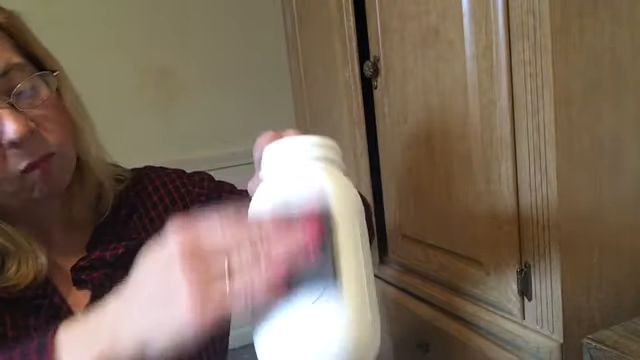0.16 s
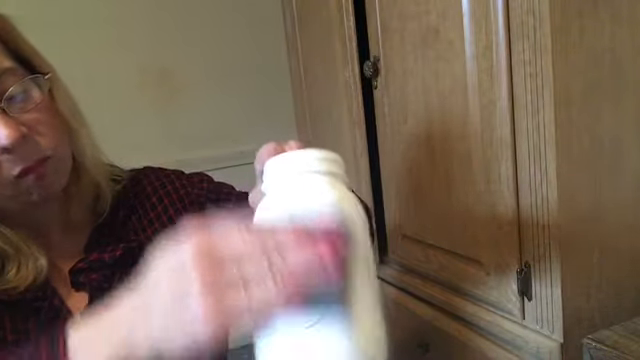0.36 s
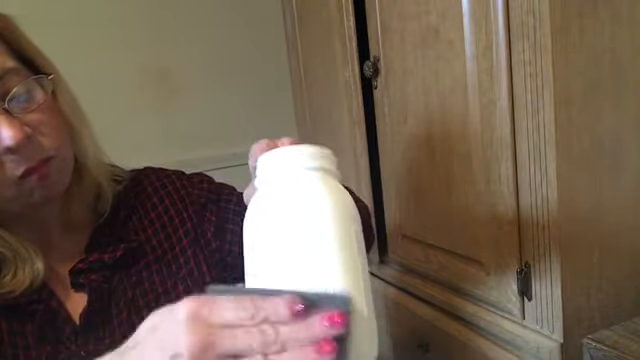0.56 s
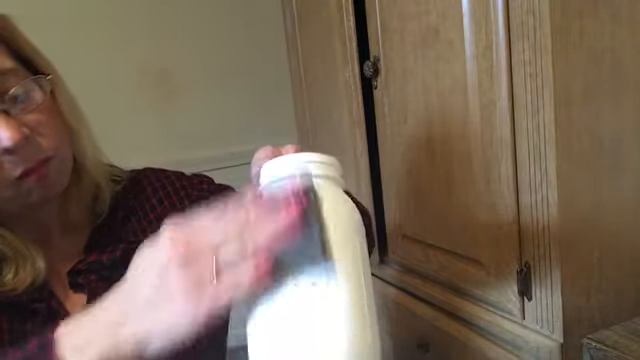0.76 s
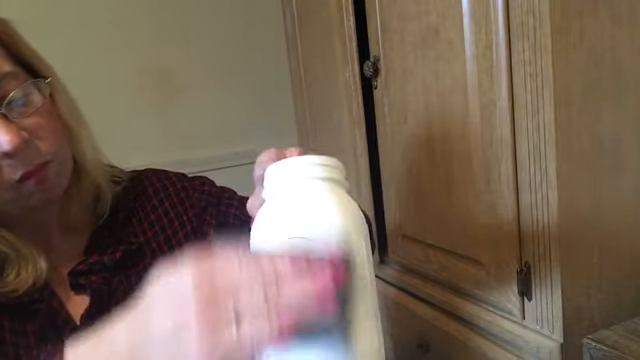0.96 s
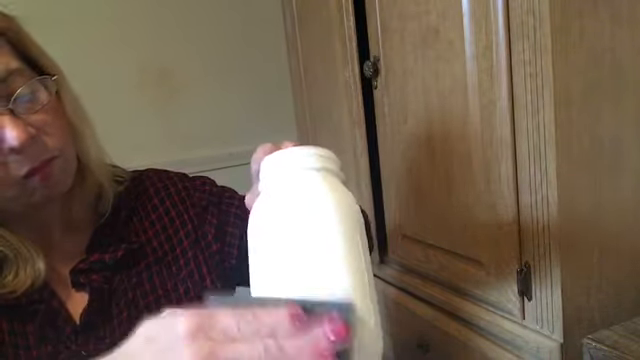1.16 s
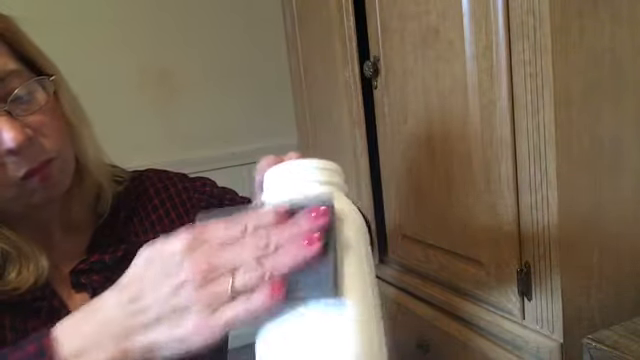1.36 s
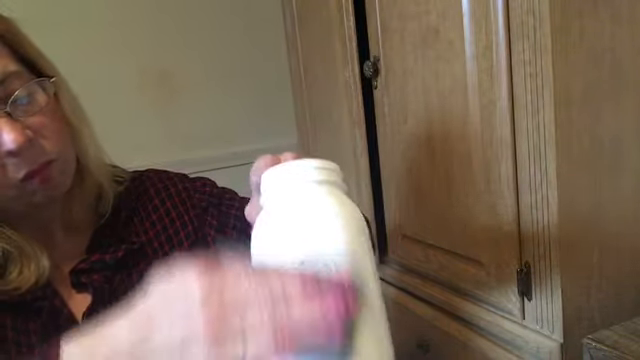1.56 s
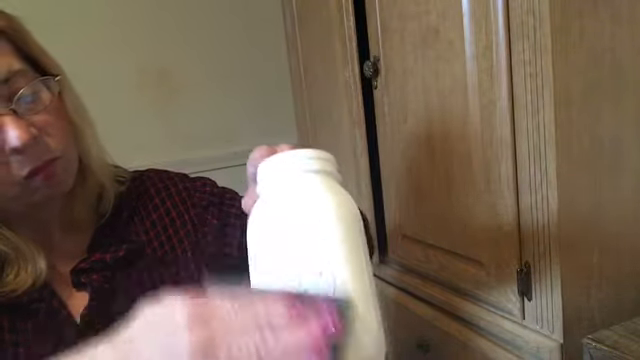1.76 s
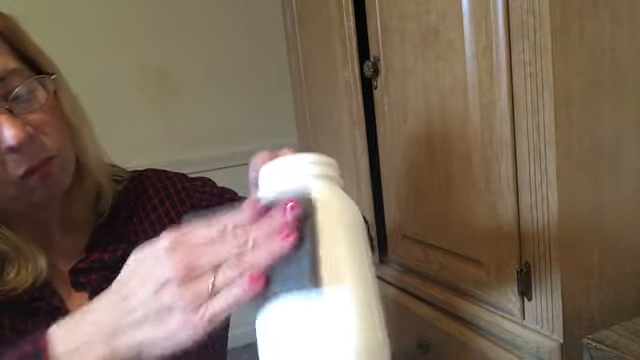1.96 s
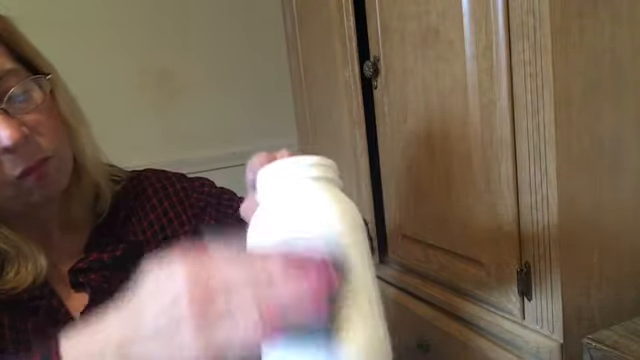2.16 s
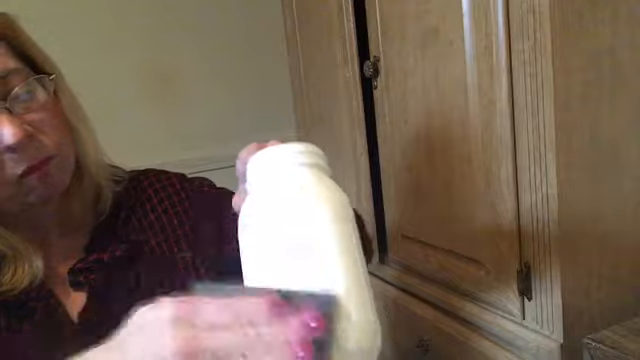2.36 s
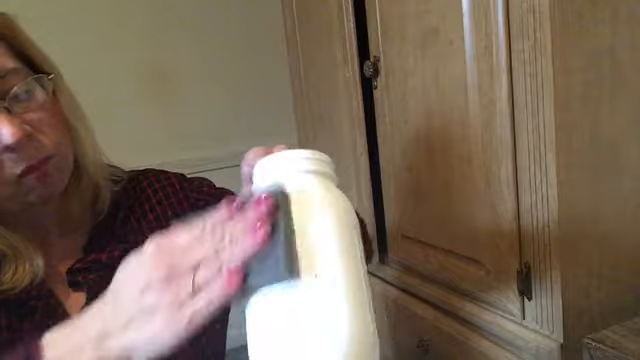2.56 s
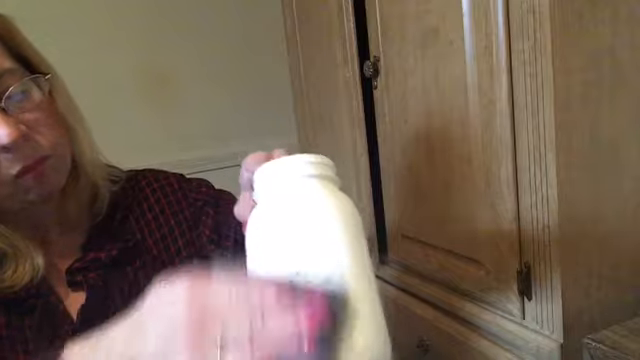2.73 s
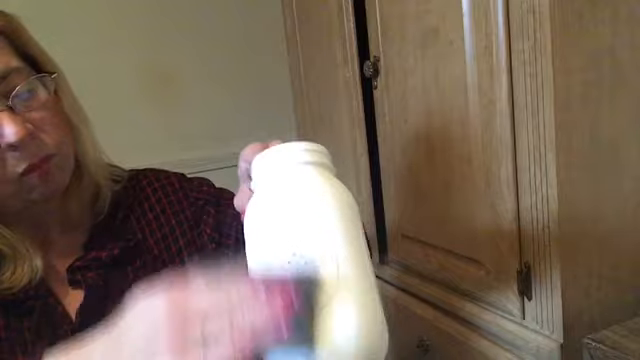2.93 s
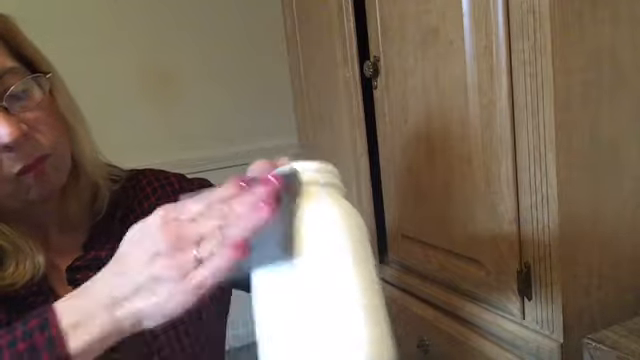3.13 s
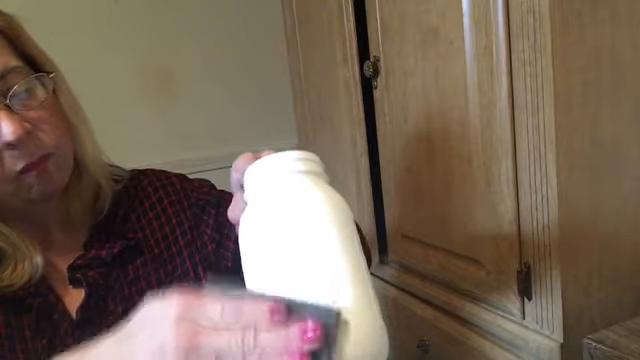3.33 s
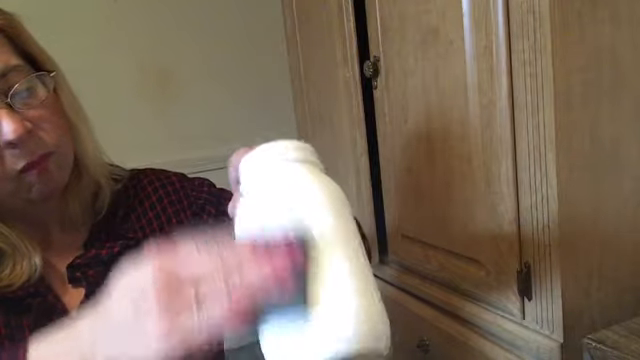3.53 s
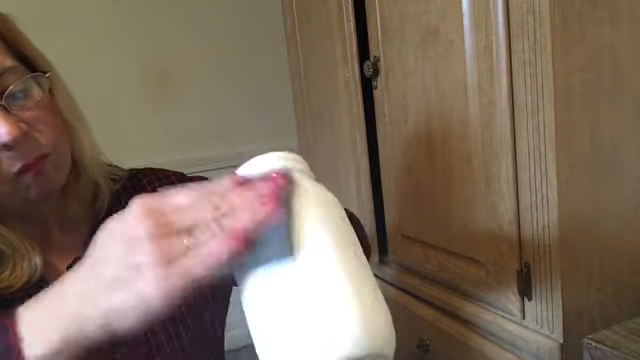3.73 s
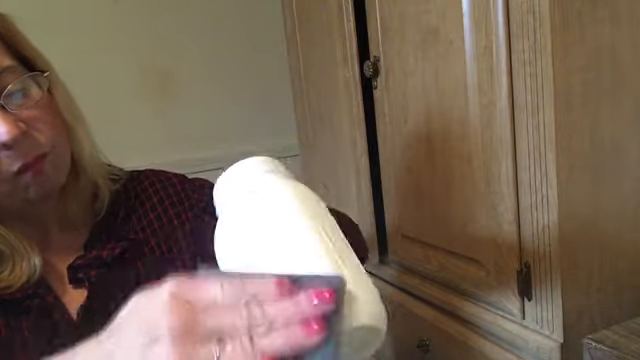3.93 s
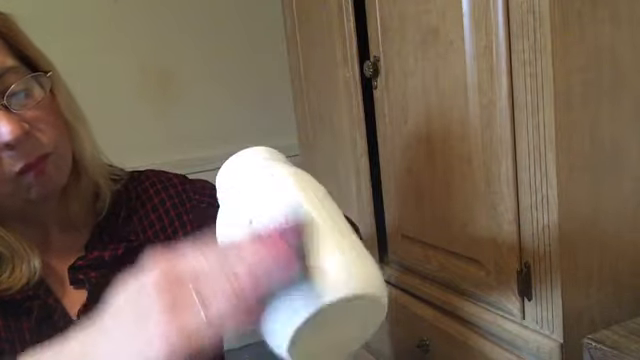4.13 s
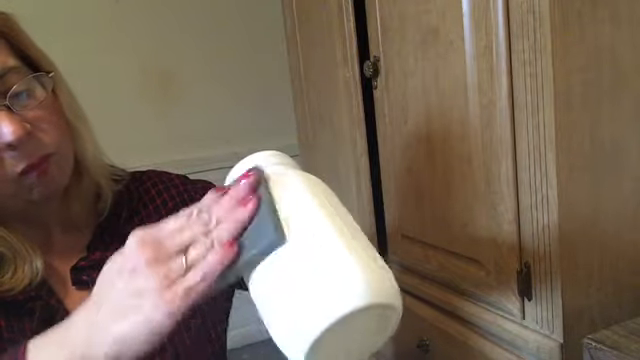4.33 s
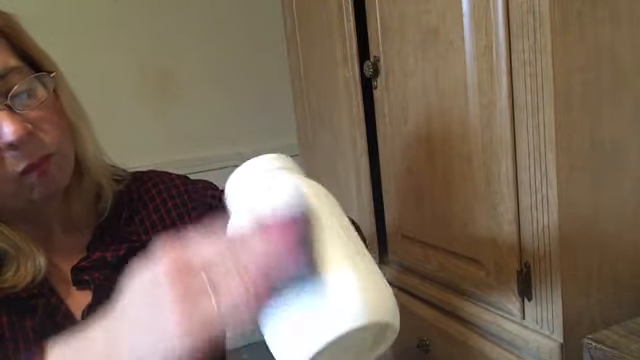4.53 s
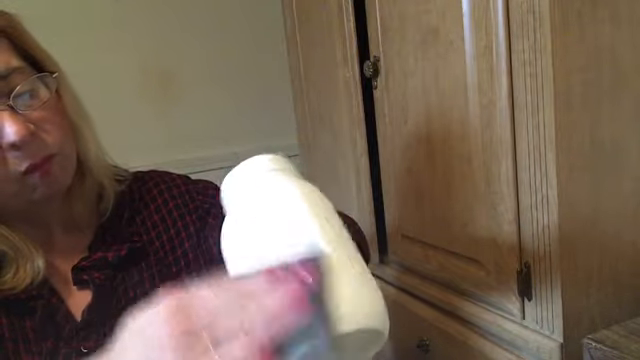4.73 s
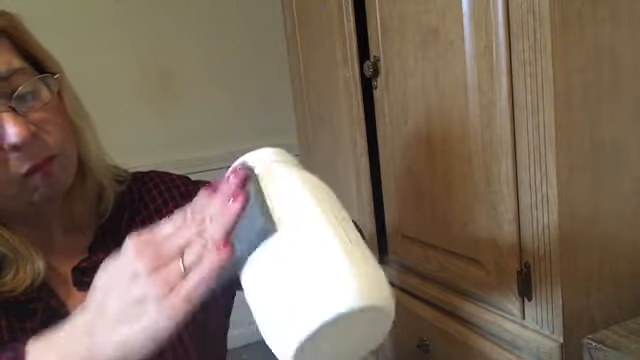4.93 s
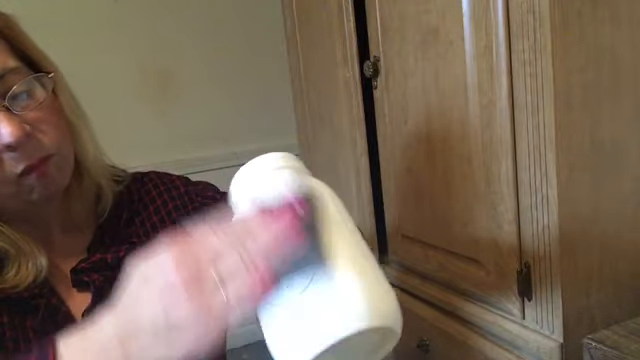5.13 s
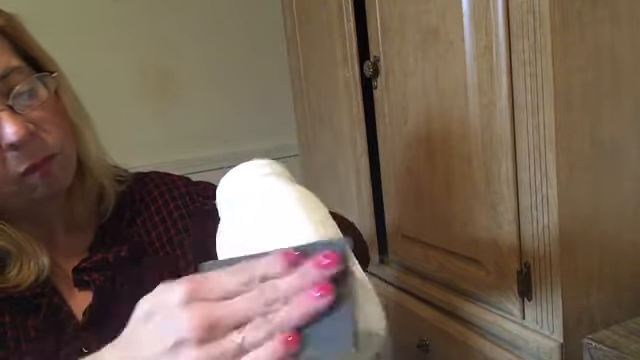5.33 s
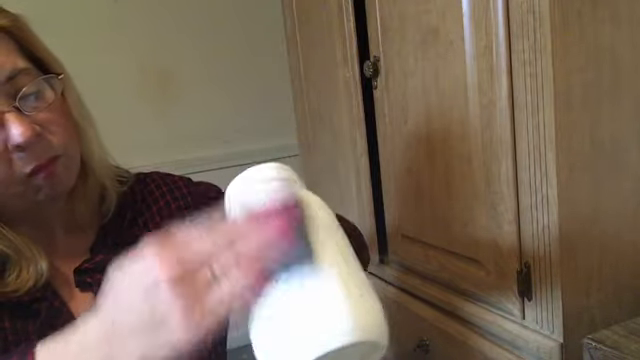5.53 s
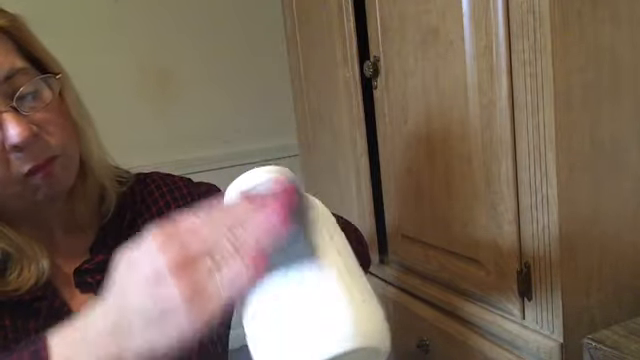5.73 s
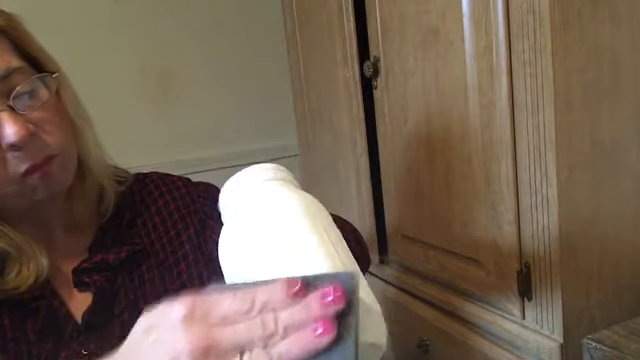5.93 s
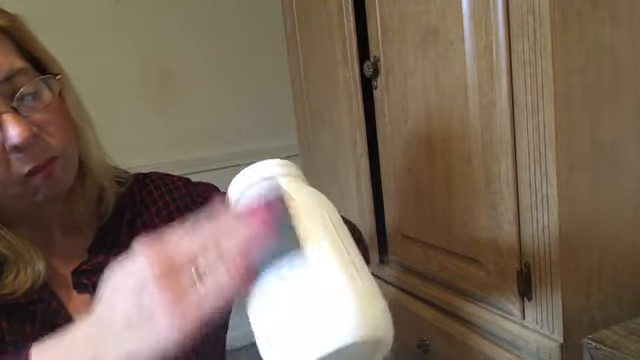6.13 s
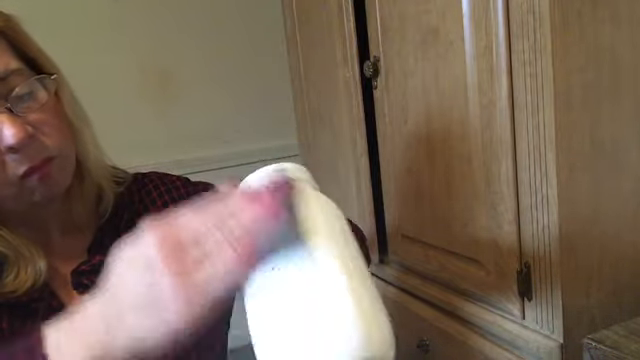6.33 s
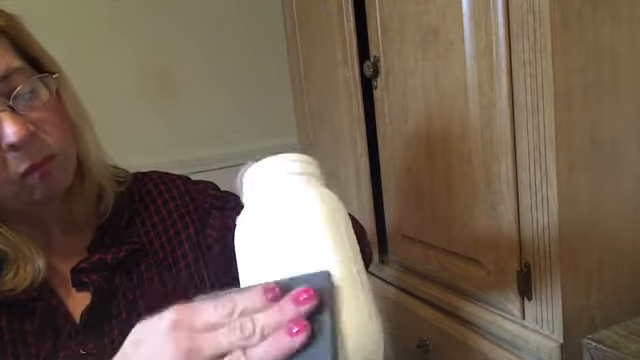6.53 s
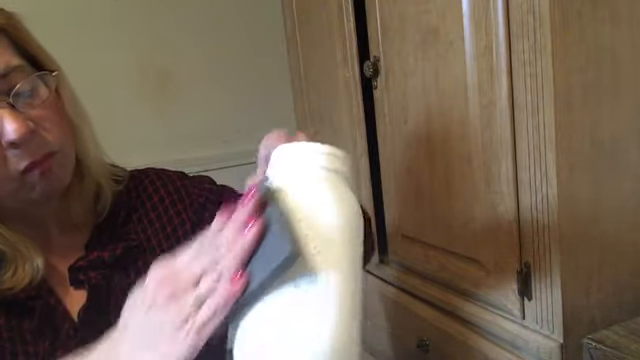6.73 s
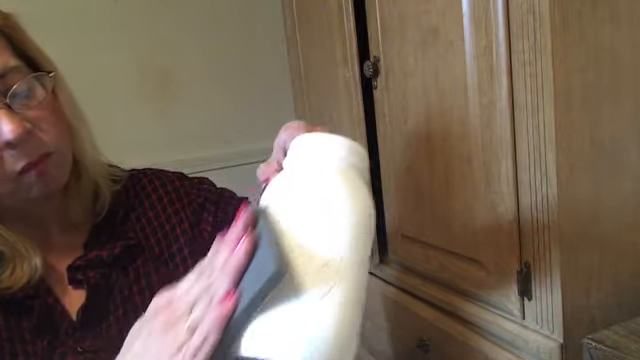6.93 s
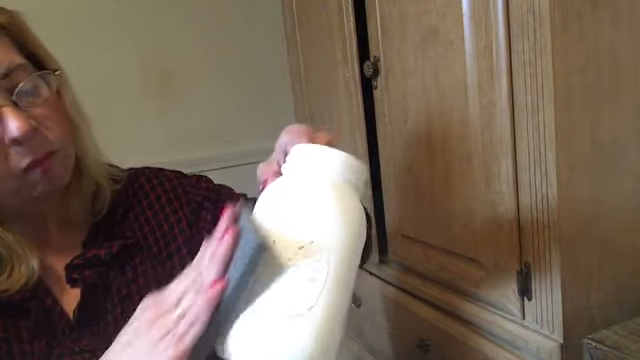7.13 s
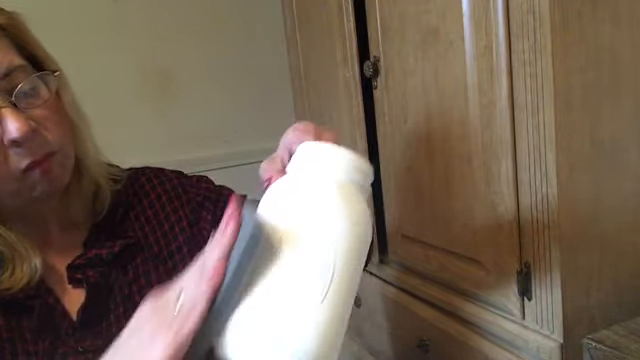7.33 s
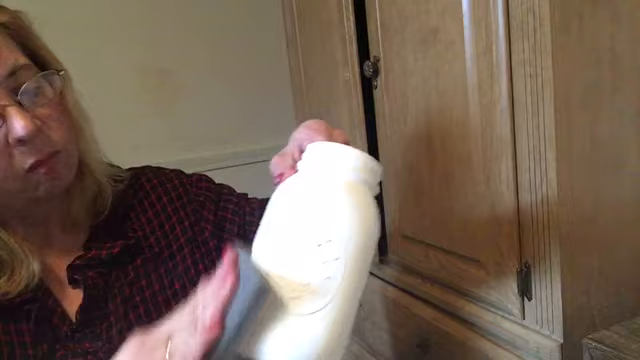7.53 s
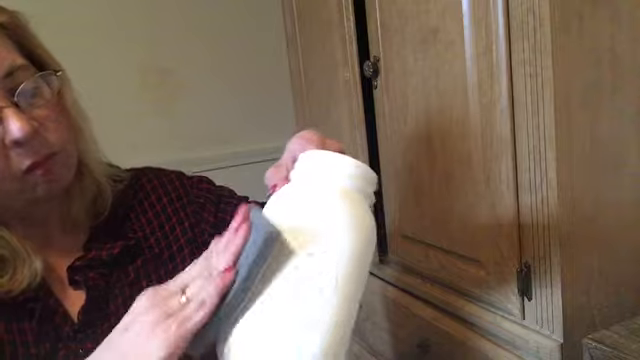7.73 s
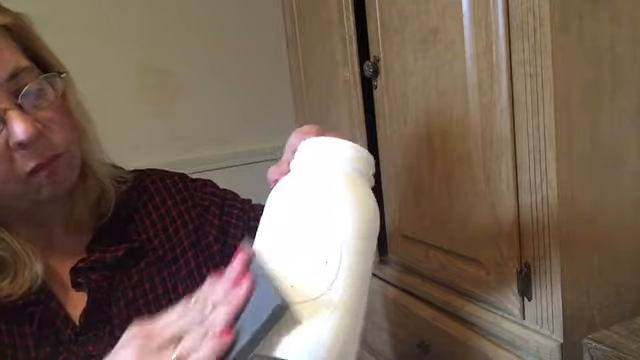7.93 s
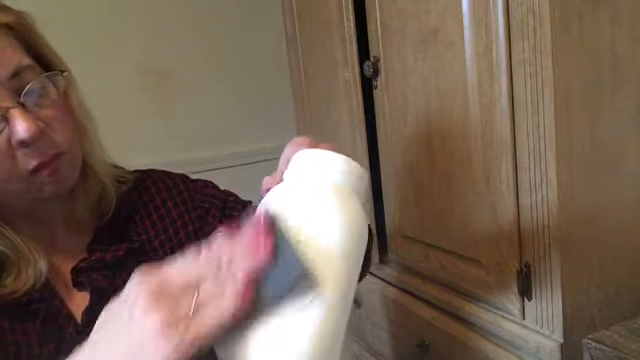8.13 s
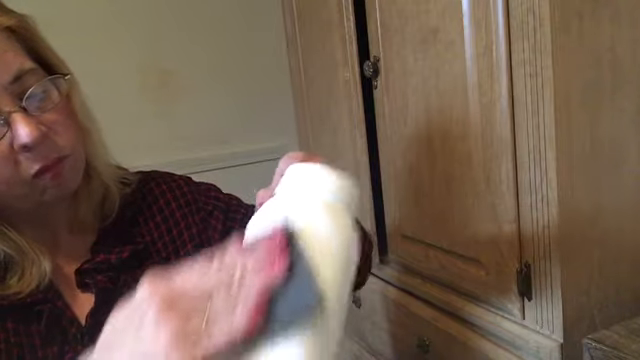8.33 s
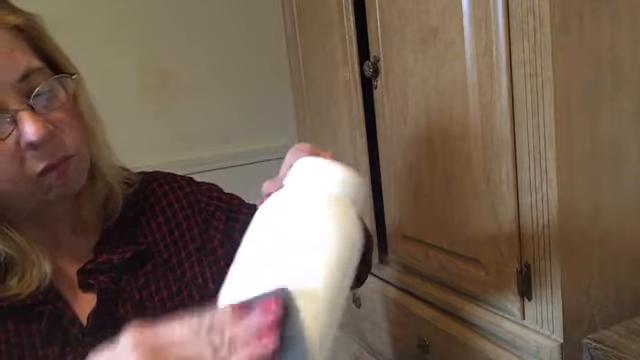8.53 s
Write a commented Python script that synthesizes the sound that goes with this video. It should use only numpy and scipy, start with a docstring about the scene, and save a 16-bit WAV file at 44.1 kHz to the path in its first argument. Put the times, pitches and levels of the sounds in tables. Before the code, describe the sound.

From 0 s a fine sanding sponge is already rubbing a painted glass jar, about seven strokes a second, close to the microphone in a quiet room. Each stroke is a dry, grainy rasp with bright hiss, swelling mid-stroke and dipping at the turn. Strokes are strongest around 0.3-1 s, then alternate between hissier and fuller scratches until about 3.3 s. From 3.5 to 4.1 s they are a little softer, with a faint glassy ring, then firmer and lower-toned through 6.3 s. At about 6.4 s a finger bumps the jar with a small, quickly decaying hollow knock. After strong strokes to 6.8 s, the rubbing turns notably lighter from 6.9 to 7.9 s, with slight thin singing from the glass, then strengthens until the cut-off at 8.6 s. Faint air, rumble and wavering low hum lie beneath.

```python
"""A fine sanding sponge rubs up and down a painted glass jar held in the hand, about seven strokes a second.
Grit is noise with snagging grains, swelling with the hand's speed; the glass wall and the air inside ring along.
A finger bumps the jar once: a decaying knock and an air tone. The quiet room adds a short noise tail,
steady air, a low rumble of shaped noise and a wavering sine hum. One close microphone feeds both channels."""
import sys
import numpy as np
from scipy import signal
from scipy.fft import rfft, irfft, next_fast_len
from scipy.io import wavfile
from scipy.ndimage import uniform_filter1d, map_coordinates

SR = 44100
rng = np.random.default_rng(int(sys.argv[2]) if len(sys.argv) > 2 else 0)


def gain_from_db(level_db):
    """Convert decibel levels to linear amplitude factors (20 dB per decade)."""
    decades = np.asarray(level_db, float) / 20
    return 10 ** decades


def wrap_up_sound(samples):
    """Save the sound to the file named by the first command line argument, as 16-bit audio."""
    columns = np.atleast_2d(samples).T
    # keep every value between -1 and 1, then stretch to whole-number steps
    tamed = np.clip(columns, -1, 1)
    steps = np.round(tamed * 32767).astype(np.int16)
    wavfile.write(sys.argv[1], SR, steps)


N = 378378  # length in samples

# centre level of the low house rumble: t/s, level/dB
RUMBLE_LEVEL = [(0, -71), (3, -75), (5, -73), (5.6, -70.5), (7.2, -67.5), (8.58, -72)]
# spectrum of the rumble: f/Hz, relative level per Hz/dB
RUMBLE_COLOUR = [(15, -40), (30, -5), (50, -9), (80, 3), (110, -10), (150, -38)]
# spectrum of the steady room air: f/Hz, relative level per Hz/dB
AIR_COLOUR = [(20, -27), (60, -10), (120, -2), (250, -6.5), (700, -4.5), (3000, -19.5), (15000, -45)]
# stronger spells of the low hum: start t/s, end t/s, centre f/Hz, centre level/dB
HUM_SPELLS = [(2.27, 3.52, 52.1, -68.5), (5.243, 5.44, 57, -60), (5.46, 6.4, 59.5, -68.5),
              (7.03, 7.3, 53.5, -63)]
# decay of the room's answer: f/Hz, time to fall 60 dB t/s
ROOM_DECAY = [(300, 0.31), (2500, 0.05), (12000, 0.07)]
# a finger bumps the jar: t/s, level/dB
FINGER_BUMPS = [(6.414, -34.5)]
# broad colour of grit on painted glass: f/Hz, relative level per Hz/dB
GRIT_COLOUR = [(120, -54.5), (215, -27.5), (260, -22.5), (450, -14.5), (640, -18), (740, -25.5),
               (1000, -17.5), (1130, -11.5), (1280, -4.5), (1580, -4), (1870, -6.5), (2460, -3), (3640, -4),
               (4850, -9), (5600, -3.5), (6100, -5.5), (6700, -4.5), (9600, -5.5), (10400, -9),
               (11500, -5.5), (15000, -11.5), (16000, -14)]
# air and wall modes of the jar, damped by hand and paint: f/Hz, width f/Hz, level over the grit/dB
JAR_MODES = [(285, 15, 10), (441, 18, 5), (678, 13, 4), (888, 22, 4), (972, 22, 3), (1541, 45, 2),
             (1685, 30, 2), (1963, 45, 1), (2450, 80, 2), (2925, 60, -1), (3550, 120, -5), (4755, 50, -1),
             (5080, 60, -2), (5590, 90, -1), (6635, 70, 1)]
# wall modes that sing when the grip leaves them free: f/Hz, width f/Hz
FREE_RINGS = [(2815, 45), (3525, 28), (3575, 32)]
# spells of singing, one list per free ring: middle t/s, half length t/s, level against the scratch/dB
SINGING_SPELLS = [
    [(3.5, 0.42, -10.5), (7.2, 0.39, -12), (7.87, 0.17, -3)],
    [(3.95, 0.37, -6.5), (5.9, 0.55, -21)],
    [(.3, 0.52, -20), (2.4, 0.67, -19), (8.15, .4, -15)],
]
# borders between air tone, hollow tone, wall tone, low scratch, high scratch, bite and hiss: f/Hz
BAND_BORDERS = [325, 760, 1950, 3100, 4800, 7400]
# added blooms of the air tone: middle t/s, half length t/s, level over the hollow tone/dB
AIR_BLOOMS = [(0, 0.38, 1), (.9, 0.44, -6), (3.3, .5, -8), (5.4, 0.34, -6), (7.55, 0.65, 5), (8.5, .4, 3)]
# strokes, down and up in turn: reversal t/s, fastest moment t/s, scratch level/dB, hiss against scratch level/dB
STROKES = [(-0.11, -0.04, -36.5, 5), (0.036, 0.112, -36, 2.5), (0.17, 0.237, -34.5, 1.5),
           (0.328, 0.424, -30.5, -1), (0.486, 0.553, -33.5, 1.5), (0.632, 0.705, -29.5, -1),
           (0.784, 0.869, -31, 1), (0.937, 1.025, -32, 0), (1.098, 1.156, -33, 2.5),
           (1.243, 1.35, -34, 1.2), (1.406, 1.458, -34.5, 5), (1.546, 1.654, -32.5, 2),
           (1.71, 1.768, -34.5, 4), (1.854, 1.91, -31.5, 1), (2.004, 2.069, -34.5, 5.5),
           (2.139, 2.223, -32.5, 2), (2.304, 2.381, -35.5, 6.5), (2.438, 2.515, -32, 3),
           (2.594, 2.671, -34.5, 5.5), (2.741, 2.807, -33, 2.5), (2.908, 2.966, -32.5, 5),
           (3.042, 3.13, -33.5, 5), (3.21, 3.313, -34, 5), (3.365, 3.439, -33, 3.5),
           (3.523, 3.586, -36, 5.5), (3.657, 3.738, -38, 4), (3.815, 3.882, -36, 1), (3.974, 4.072, -37, 1),
           (4.123, 4.176, -35.5, 2.3), (4.244, 4.321, -33.5, 2.3), (4.392, 4.457, -33, 0.5),
           (4.515, 4.6, -32, 0.5), (4.667, 4.756, -36.5, 5), (4.822, 4.907, -34.5, 3),
           (4.982, 5.038, -33.5, 4), (5.099, 5.192, -33, -1), (5.265, 5.31, -34.5, 3.5),
           (5.397, 5.506, -35, -2), (5.548, 5.61, -38.5, 2.5), (5.67, 5.77, -33, -2),
           (5.844, 5.911, -34.5, 1.5), (5.982, 6.066, -32.5, -1.5), (6.146, 6.224, -36, 3),
           (6.277, 6.344, -32.5, -1), (6.451, 6.531, -31.5, 3.5), (6.582, 6.656, -31.5, -2),
           (6.725, 6.813, -32.5, -1), (6.914, 7.034, -38.5, -1.5), (7.065, 7.243, -40.5, -1.5),
           (7.295, 7.376, -38.5, 1), (7.447, 7.524, -40.5, 0.5), (7.612, 7.677, -39, 0),
           (7.767, 7.876, -40, 0.5), (7.944, 8.063, -37, 3.5), (8.12, 8.199, -37.5, 3.5),
           (8.28, 8.386, -34, 4), (8.452, 8.539, -34, 0.5)]
# how the hand sweeps: t/s, scratch level left at the reversals/dB, pointedness (under 1 blunt, over 1 peaked)
HAND = [(0, -50, 0.99), (.4, -49.5, 1.05), (.85, -46, 1.01), (1.4, -47.5, 1.5), (1.9, -47, 1.12),
        (2.5, -48.5, 0.87), (3, -48, 1.18), (3.35, -53.5, 0.71), (3.65, -52, 1.08), (3.98, -52.5, 0.61),
        (4.13, -49.5, 0.99), (4.6, -47.5, 1.1), (5.3, -44.5, 1.6), (5.8, -46.5, 1.05), (6.5, -46.5, 1.15),
        (6.72, -47.5, 0.81), (6.92, -52, 1.7), (7.08, -49.5, 1.7), (7.25, -54, 2.1), (7.36, -54, 0.42),
        (7.55, -57.5, 0.43), (7.78, -58.5, 0.8), (8.12, -52, 0.91), (8.58, -48, 1.1)]
# how the jar is held, in relative units: t/s, turn of the sanded side away from the microphone,
# tip, how far the fingers leave the mouth open
POSE = [(0, -1.1, -1.4, 1), (.45, -0.22, 0.69, .1), (.9, 0.1, 1, -0.5), (1.4, -0.66, 0.4, 0.9),
        (1.9, 0.037, 0.59, 0.45), (2.4, -0.13, 0.42, 0.5), (2.8, 1.05, .5, 0.1), (3.2, 0.69, .3, -1.4),
        (3.65, -0.37, -.9, 0.7), (4.05, -0.85, -1.1, .5), (4.5, -1, -1, -0.35), (5.2, -0.83, -0.16, .2),
        (5.65, -0.69, .2, 1.5), (6, -0.6, 0.2, -.1), (6.35, -1.05, -.3, 0.05), (6.72, 1.46, .8, -1.5),
        (7.15, 0.7, 0.33, -1.4), (7.4, -0.17, -.2, .5), (7.7, 0.4, -.1, -0.7), (7.9, 1.7, .2, -3),
        (8.2, 0.17, .4, 0.5), (8.58, -0.36, .4, -0.3)]
# colour of the sponge at a reversal, against the scratch: hiss level/dB, wall tone level/dB, hollow tone level/dB
SLOW_COLOUR = [-3, -3.5, -15]


def unit(x):
    """Scaled to rms 1."""
    return x / np.sqrt(np.mean(x ** 2, axis=-1, keepdims=True) + 1e-20)


def along(points, hz):
    """A table of values over frequency, read on a log axis."""
    f, v = np.transpose(points)
    return np.interp(np.log(hz + 1), np.log(f + 1), v)


def curves(rows):
    """One value per sample for each column after the time."""
    s, *columns = np.transpose(rows)
    return [np.interp(np.arange(N) / SR, s, column) for column in columns]


def spells(rows):
    """Rounded swells of amplitude, summed, each centred on its middle."""
    t = np.arange(N) / SR
    return sum(gain_from_db(db) * np.cos(np.pi / 2 * np.clip((t - s) / half, -1, 1)) for s, half, db in rows)


def wobble(rate):
    """A smooth random curve, rate knots a second."""
    knots = rng.standard_normal(int(N * rate / SR) + 4)
    return map_coordinates(knots, [np.arange(N) * rate / SR])


def filtered(x, response):
    """The sound shaped by a response of frequency."""
    m = next_fast_len(N + 8192)
    return irfft(rfft(x, m) * response(np.fft.rfftfreq(m, 1 / SR)), m)[..., :N]


def causal(gain):
    """Minimum-phase response of a gain: it rings only after its cause."""
    cepstrum = irfft(np.log(gain + 1e-6))
    half = len(cepstrum) // 2
    cepstrum[1:half] *= 2
    cepstrum[half + 1:] = 0
    return np.exp(rfft(cepstrum))


def shaped_noise(colour):
    """Steady noise of rms 1 with the given spectrum."""
    return unit(filtered(rng.standard_normal(N), lambda hz: gain_from_db(along(colour, hz))))


def rumble():
    """Low shaped noise that comes and goes about its centre level."""
    swing_db = 2.5
    return gain_from_db(curves(RUMBLE_LEVEL)[0] + swing_db * wobble(4)) * shaped_noise(RUMBLE_COLOUR)


def hum():
    """A sine wavering in pitch and level; it is faint between stronger spells, each with its own pitch."""
    edge_s, faint_hz, faint_db = 0.088, 55, -76.5
    t = np.arange(N) / SR
    drift = np.cumsum(1.1 * wobble(14)) / SR  # in cycles

    def tone(hz):
        return np.sqrt(2) * np.sin(2 * np.pi * (hz * t + drift))

    gates = [np.clip(np.minimum(t - s0, s1 - t) / edge_s + 0.5, 0, 1) for s0, s1, _, _ in HUM_SPELLS]
    strong = sum(gate * gain_from_db(db) * tone(hz) for gate, (_, _, hz, db) in zip(gates, HUM_SPELLS))
    faint = (1 - np.max(gates, axis=0)) * gain_from_db(faint_db) * tone(faint_hz)
    return gain_from_db(1.6 * wobble(14)) * (strong + faint)


def hush():
    """The quiet bed: steady room air, rumble and hum."""
    return gain_from_db(-64.5) * shaped_noise(AIR_COLOUR) + rumble() + hum()


def room(x):
    """The room's answer as a noise tail in which each frequency dies at its own speed."""
    hz, t, z = signal.stft(rng.standard_normal(SR // 2), SR, nperseg=256)
    decay = gain_from_db(-60 * t / along(ROOM_DECAY, hz)[:, None])
    tail = signal.istft(z * decay, SR, nperseg=256)[1]
    late = np.pad(x, (300, 0))  # delay in samples
    return signal.fftconvolve(late, tail / np.linalg.norm(tail))[:N]


def bumps():
    """A soft knock with the jar's lowest air mode ringing on longer, both decaying sines."""
    out, t = np.zeros(N + SR), np.arange(SR // 4) / SR
    knock = gain_from_db(-60 * t / 0.028) * np.sin(2 * np.pi * 400 * t)
    ring = 0.31 * gain_from_db(-60 * t / 0.083) * np.sin(2 * np.pi * JAR_MODES[0][0] * t)
    soft_onset = 1 - np.exp(-t / 0.0011)
    for s, db in FINGER_BUMPS:
        out[round(s * SR):][:len(t)] += gain_from_db(db) * soft_onset * (knock + ring)
    return out[:N]


def jar_gain(hz):
    """Grit colour with the jar's resonances standing on it."""
    modes = sum(gain_from_db(db) ** 2 / (1 + (2 * (hz - centre) / width) ** 2) for centre, width, db in JAR_MODES)
    return gain_from_db(along(GRIT_COLOUR, hz)) * np.sqrt(1 + modes)


def shares(hz, steep):
    """Overlapping bands that add up to one."""
    below = [1 / (1 + (hz / edge) ** steep) for edge in BAND_BORDERS]
    return np.diff([0 * hz, *below, 0 * hz + 1], axis=0)


def paths(hz):
    """From the contact to the air: the bands of the jar's colour, then the free wall resonances."""
    rings = [1j * hz * width / (centre ** 2 - hz ** 2 + 1j * hz * width) for centre, width in FREE_RINGS]
    return np.vstack([causal(jar_gain(hz)) * shares(hz, steep=15.6), rings])


def patches(x, size, depth_db):
    """Random gain in patches about 0.1 s long, the narrower in pitch the larger the frame size."""
    z = signal.stft(x, nperseg=size)[2]
    field = uniform_filter1d(rng.standard_normal(z.shape), size=4, axis=0)
    field = uniform_filter1d(field, size=SR // 5 // size, axis=1)
    return signal.istft(z * gain_from_db(depth_db * field / field.std()), nperseg=size)[1][:N]


def grit():
    """Fine grains blur to noise and some snag harder; as the contact moves, broad patches shift and tones flare."""
    snags = (rng.random(N) < 0.02) * rng.standard_normal(N)
    grains = rng.standard_normal(N) + gain_from_db(-10) * unit(snags)
    clumped = grains * gain_from_db(0.88 * wobble(180))
    shifting = patches(clumped, size=256, depth_db=1.06)
    return unit(patches(shifting, size=2048, depth_db=1.5))


def blend(a, b, lean_db):
    """Gains of two neighbouring bands of power a and b: rms 1 together, leaning to the first by lean_db."""
    total = np.sqrt(gain_from_db(lean_db) ** 2 * a + b)
    return gain_from_db(lean_db) / total, 1 / total


def strokes():
    """Speed swells from reversal to mid-stroke and the scratch with it: speed 0..1, scratch dB, hiss dB, direction."""
    last_turn_s = 8.63
    top_turn_db = 0.84  # reversals before a down stroke are this much louder, before an up stroke softer
    t = np.arange(N) / SR
    start_s, crest_s, crest_db, hiss_db = np.transpose(STROKES)
    turn_s = np.r_[start_s, last_turn_s]
    upward = -(-1.0) ** np.arange(len(turn_s))  # -1 down, +1 up
    hand_s, rest_db, pointed = np.transpose(HAND)
    turn_db = np.interp(turn_s, hand_s, rest_db) - top_turn_db * upward
    knots = np.sort(np.r_[turn_s, crest_s])
    travel = np.interp(t, knots, np.arange(len(knots)) % 2)  # 0 at reversals, 1 at the fastest moment
    stroke = np.searchsorted(turn_s, t, side="right") - 1
    slow_db = turn_db[stroke + (t > crest_s[stroke])]
    power = np.clip(np.interp(crest_s, hand_s, pointed), 0.3, 4)
    speed = np.sin(np.pi / 2 * travel) ** power[stroke]
    speed = uniform_filter1d(speed, size=SR // 90)  # the foam gives, so no reversal is abrupt
    scratch_db = slow_db + speed * (crest_db[stroke] - slow_db)
    return speed, scratch_db, hiss_db[stroke], upward[stroke]


def sponge():
    """Grit driven through the jar: faster is louder; direction, speed and the jar's pose set the colour."""
    speed, scratch_db, full_hiss_db, upward = strokes()
    turn, tip, mouth = curves(POSE)
    # tones against the scratch: usual dB, dB by direction, dB per unit of pose
    full_wall_db = -6.5 + 0.28 * upward - 3.5 * turn
    full_wall_db = full_wall_db + 0.27 * full_hiss_db  # a stroke rich in hiss is rich in wall tone too
    full_hollow_db = -24 + 2.1 * upward + 4.2 * mouth
    # the colour of the stroke is reached well before its full speed
    full_colour = [full_hiss_db, full_wall_db, full_hollow_db]
    hiss_db, wall_db, hollow_db = [slow + speed ** 0.74 * (full - slow)
                                   for full, slow in zip(full_colour, SLOW_COLOUR)]
    high_db = 0.01 + 2.4 * turn  # high over low scratch
    air_db = 20 * np.log10(gain_from_db(-3) + spells(AIR_BLOOMS))  # air over hollow tone
    # slow grains pass too seldom to make the highest hiss, and at full speed the bite leads again
    bite_db = 3.5 * tip + 6.0 * (1 - speed) ** 3 + 2.9 * speed ** 3

    powers = np.mean(abs(paths(np.fft.rfftfreq(2 ** 15, 1 / SR))) ** 2, axis=1)
    air, hollow, wall, low, high, bite, hiss, *rings = powers
    gripped_db = -30.5  # level the free rings keep outside their spells
    free = [(gain_from_db(gripped_db) + spells(rows)) / np.sqrt(ring) for rows, ring in zip(SINGING_SPELLS, rings)]
    drive = [*gain_from_db(hollow_db) * blend(air, hollow, air_db),
             gain_from_db(wall_db) / np.sqrt(wall),
             *blend(low, high, -high_db),
             *gain_from_db(hiss_db) * blend(bite, hiss, bite_db),
             *free]
    # the force swells before the jar colours it, so narrow modes ring on into the reversals
    force = gain_from_db(scratch_db + 0.9 * wobble(30)) * grit()
    return filtered(force * drive, paths).sum(axis=0)


def scene():
    """One microphone feeds both channels: the jar, the room's answer and the quiet bed."""
    near = sponge() + bumps()
    return np.tile(near + gain_from_db(-17) * room(near) + hush(), (2, 1))


def top_cut(x):
    """Nothing passes above the cut-off."""
    return signal.sosfilt(signal.butter(12, 16870, fs=SR, output="sos"), x)


def record(dry):
    """The finished mix keeps nothing from the band limit up."""
    limit_hz = 15760
    mix = filtered(dry, lambda hz: hz < limit_hz)
    return top_cut(mix)


dry = scene()
out = record(dry)
wrap_up_sound(out)
```